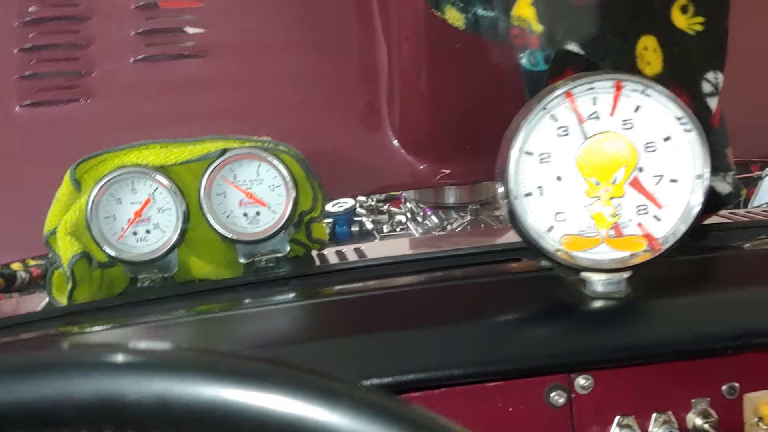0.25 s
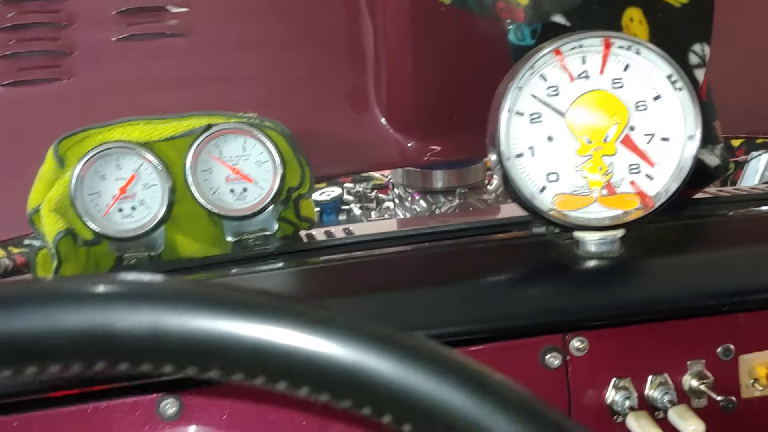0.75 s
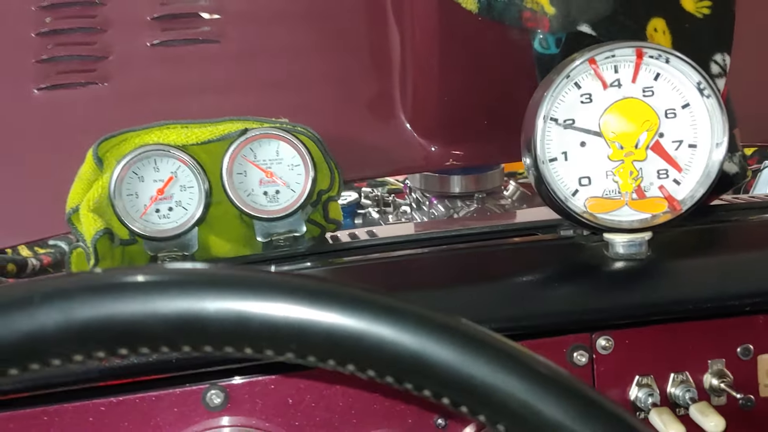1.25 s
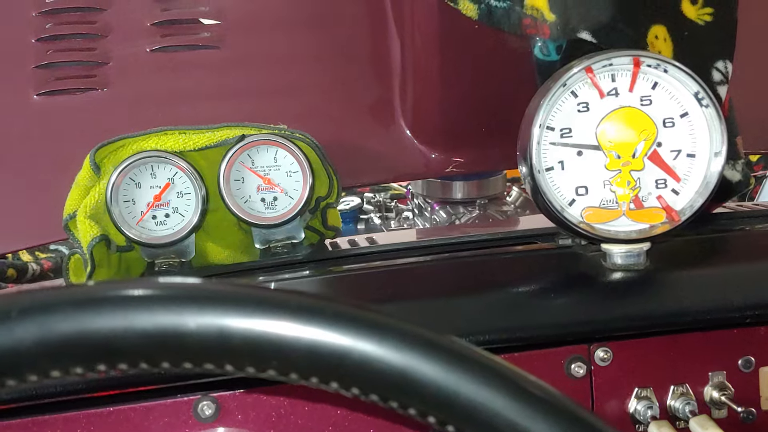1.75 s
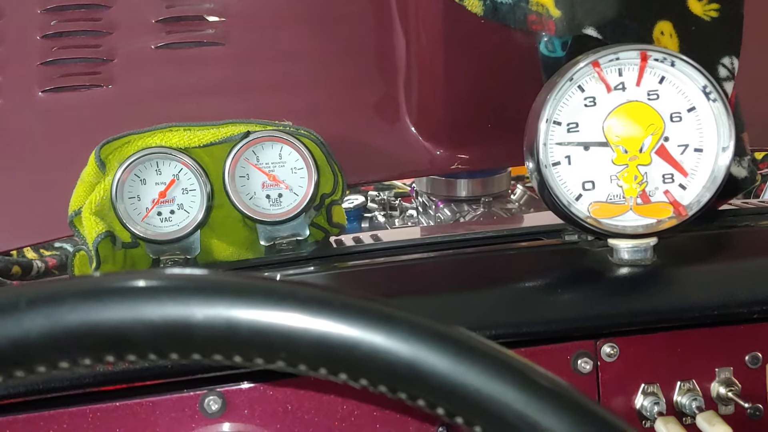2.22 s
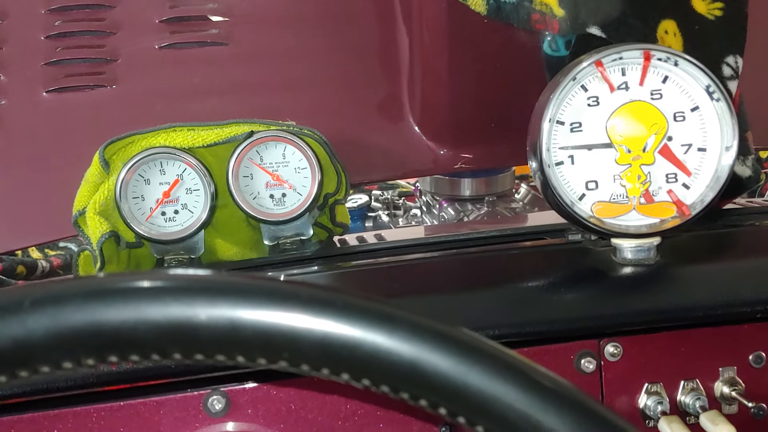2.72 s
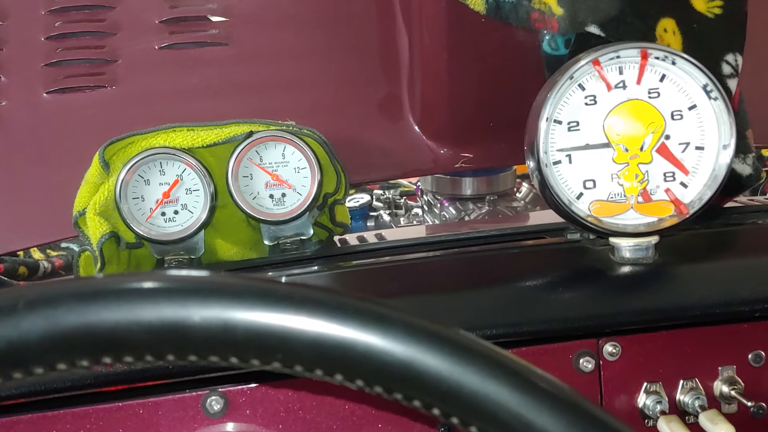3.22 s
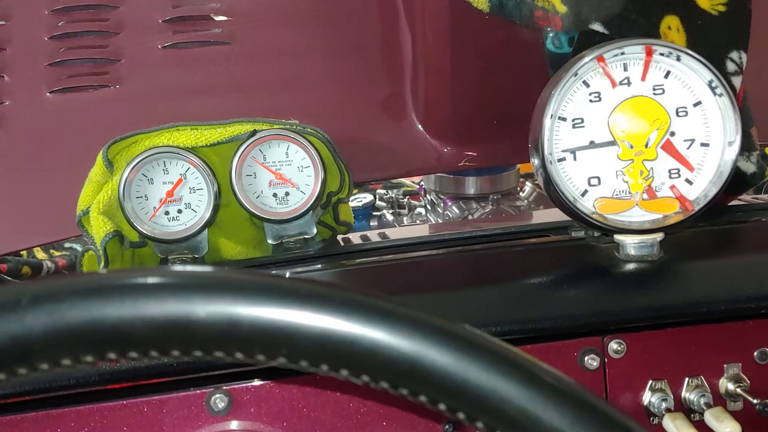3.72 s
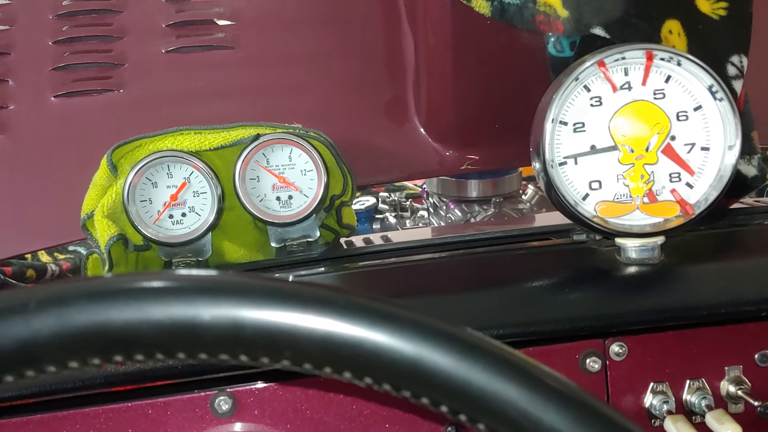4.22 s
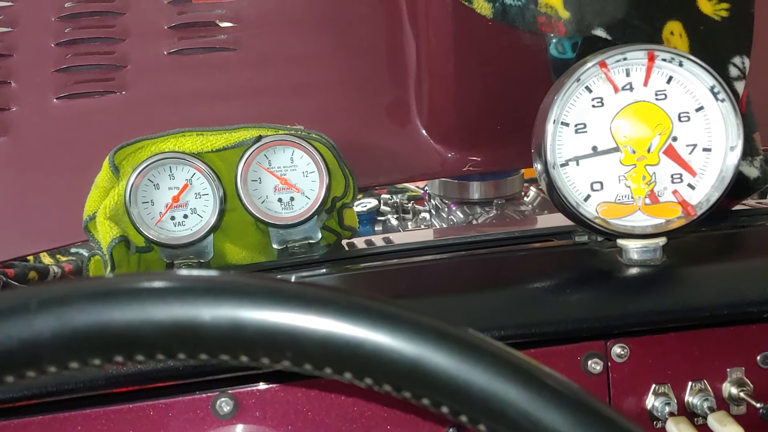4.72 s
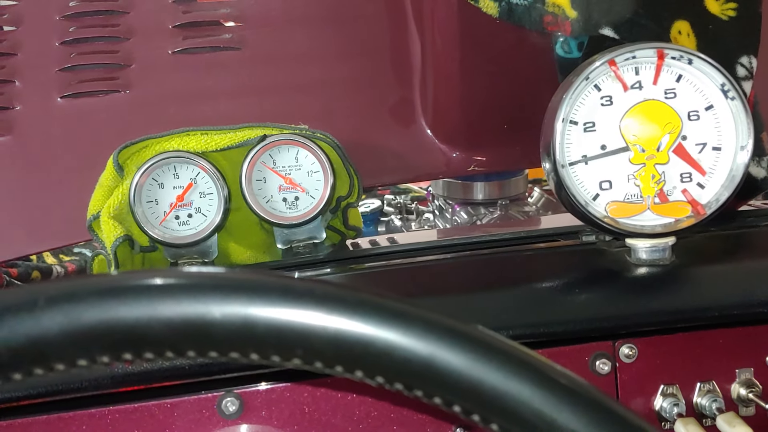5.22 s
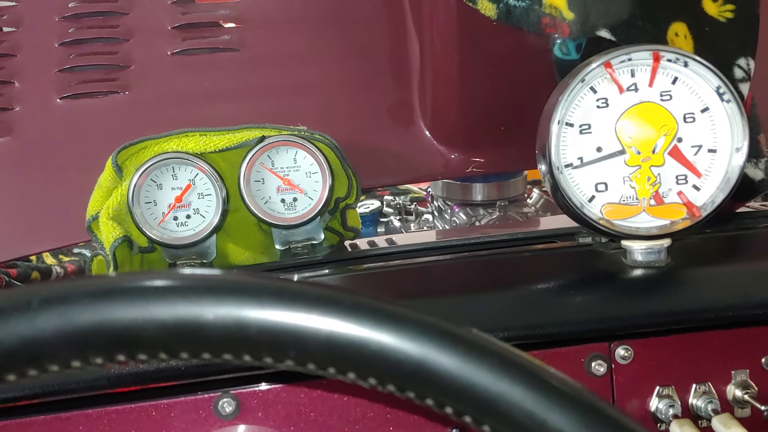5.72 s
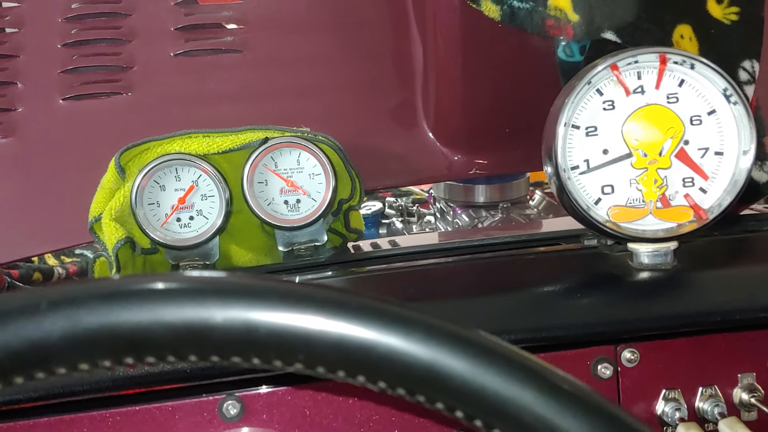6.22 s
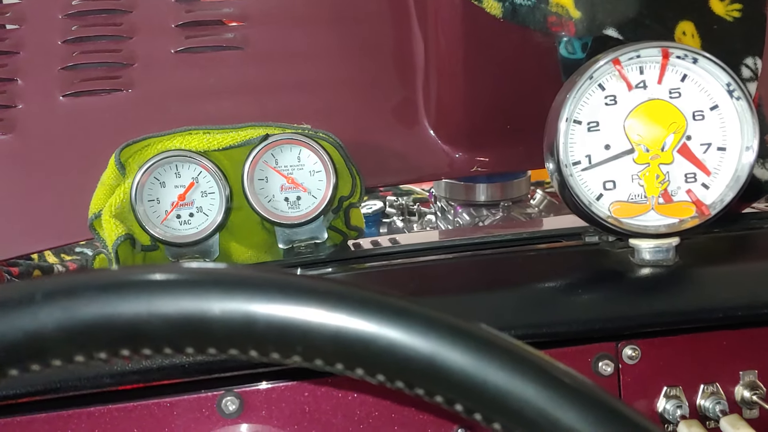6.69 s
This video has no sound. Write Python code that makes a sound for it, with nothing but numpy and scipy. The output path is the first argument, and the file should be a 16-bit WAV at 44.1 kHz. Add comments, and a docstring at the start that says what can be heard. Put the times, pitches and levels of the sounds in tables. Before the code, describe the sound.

A big carbureted engine is heard from the driver's seat, starting mid-rev with a raspy intake bark. The throttle shuts within a quarter second and the pitch slides down into a deep, lumpy idle. Irregular hard firings thud, the carburetor spits back softly, and panels rattle. Close stereo microphones, very loud, boomy bass, no voices.

```python
"""Truck cab: an eight-cylinder carbureted engine, a blip of throttle, then the revs sag to a lumpy idle.
Uneven firings (cycle harmonics plus random pulses) boom and growl through pipe and cab responses.
Hard firings thud as decaying sines; valve gear, ticking and intake hiss are bands of throbbing noise.
Spits back through the carburetor are noise bursts; random taps ring the dash panels, a loose part chimes.
Two unlike microphone ports hear it; a limiter holds the peaks just under full scale."""
import sys
import numpy as np
from scipy import signal
from scipy.fft import rfft, irfft
from scipy.io import wavfile
from scipy.ndimage import uniform_filter1d, minimum_filter1d

SR = 44100
rng = np.random.default_rng(int(sys.argv[2]) if len(sys.argv) > 2 else 0)


def dump_mix(stems):
    """Bounce the given channels to the path in sys.argv[1] as a 16-bit WAV at rate SR."""
    frames = np.atleast_2d(stems).T  # one column per channel
    limited = np.clip(frames, -1, 1)  # hard clip at full scale
    pcm = np.round(limited * 32767).astype(np.int16)
    wavfile.write(sys.argv[1], SR, pcm)


def amplitude_ratio(level_db):
    """Convert a level in decibels to the matching linear amplitude (field) ratio."""
    exponent = np.asarray(level_db, float) / 20
    return 10 ** exponent


N = 306495
TIME = np.arange(N) / SR
HZ = np.fft.rfftfreq(N, 1 / SR) + 1e-3  # offset keeps the log finite

# crank speed: t/s, firing rate/Hz, load (0 throttle open, 1 coasting, 2 idle)
CRANK_SPEED = [(0, 190, 0), (.18, 240.8, 0.1), (.25, 237.5, 0.83), (.4, 219.4, 0.84), (.6, 197.8, 0.57),
               (.9, 154.7, 0.87), (1.1, 137.9, 0.78), (1.3, 128, 0.6), (1.6, 115.3, 0.85), (2, 104.9, 1.17),
               (2.5, 96.04, 1.29), (3, 90.43, 1.66), (4, 79.88, 1.94), (4.8, 73.86, 1.8),
               (5.2, 70.53, 2.09), (6, 58.8, 1.86), (6.5, 54.43, 1.5), (6.95, 52.86, 1.4)]
# weak firing, then a hard one: t/s of the hard one, dip before it/dB, relative level/dB, ring f/Hz
HARD_FIRINGS = [(0.64, -15, -12, 79.5), (0.69, 0, -1, 83), (0.845, -12, -4, 69), (0.973, -5, -1, 71.6),
                (1.185, -9, -9, 76.9), (1.39, -8, 0.5, 86), (1.461, -13, 2.5, 79.6), (1.607, -7, -7, 81),
                (1.725, -12, -9, 75), (1.862, -18, 1, 78.1), (1.95, -10, -9.5, 77.6),
                (2.195, -11, 7.5, 76.4), (2.436, -16, 5.5, 83.4), (2.58, -4, -4, 91), (2.64, -5, -5, 91),
                (2.844, -7, 2, 97.4), (3.018, -11, -11, 98), (3.12, -7, -7, 86), (4.991, -9.5, 1.5, 69.7),
                (5.456, -9, 4, 65), (5.595, -6.5, -1, 67), (5.685, -5.5, -5, 72), (5.77, -11, -2.5, 79),
                (5.854, -9, -11, 64), (5.958, -9, -8, 61.6), (6.137, -2.5, 4, 68.7), (6.242, -7.5, 0.5, 73),
                (6.303, -13, -6, 61), (6.411, -7, -1, 57.34), (6.516, -6, 3, 51.3), (6.61, -7, 2.5, 59.8),
                (6.685, -4, -1, 73.34), (6.84, -15, -7, 70.6)]
# spits back through the carburetor: t/s, relative level/dB, relative treble level/dB
CARB_SPITS = [(0.3084, -15.5, -40), (0.371, -29, -36), (0.4424, -29, -35), (0.6593, -16, -40),
              (0.9403, -22, -45), (1.6242, -16, -40), (1.8858, -28, -49), (1.9662, -22, -50),
              (2.129, -25, -37), (2.3882, -19.5, -51), (2.5965, -18.5, -49), (2.6959, -29, -43),
              (2.864, -22, -42), (2.915, -34, -37), (3.1266, -27, -37), (3.3877, -25, -37),
              (3.5783, -20.5, -53), (3.7738, -24.5, -37), (3.9699, -25, -36.5), (4.3635, -33, -38),
              (4.72, -34, -38), (4.9105, -23, -38), (5.1506, -22.5, -40), (5.238, -26, -39.5),
              (5.3782, -26, -39.5), (5.463, -22.5, -40), (5.597, -34.5, -42), (5.7994, -30, -40),
              (5.8711, -26, -36.5), (5.886, -17, -36.5), (5.9794, -18.5, -37), (6.142, -14, -35),
              (6.3096, -27, -38), (6.4108, -18, -34), (6.4394, -18.5, -37.5), (6.5176, -21, -37),
              (6.6092, -13.5, -35.5), (6.6394, -16.5, -35), (6.6977, -30, -49), (6.7251, -20.5, -41),
              (6.8503, -25, -42), (6.9017, -17.5, -41)]


def unit(x):
    """Scale to rms 1."""
    return x / np.sqrt(np.mean(x ** 2))


def curves(table):
    """Columns of a time table, one value a sample."""
    s, *columns = np.transpose(table)
    return [np.interp(TIME, s, c) for c in columns]


def shape(hz, values):
    """A spectrum interpolated on a log-frequency axis, one value a bin."""
    return np.interp(np.log(HZ), np.log(hz), values)


def filt(x, response):
    """Apply a frequency response."""
    return irfft(rfft(x) * response, N)


def steep(edge_hz, order):
    """Power-complementary low and high halves around an edge."""
    low_power = 1 / (1 + (HZ / edge_hz) ** order)
    return np.sqrt(low_power), np.sqrt(1 - low_power)


def even(x, window_s, share):
    """Iron out a share of the slow swell of x."""
    size = int(window_s * SR)
    power = uniform_filter1d(uniform_filter1d(x ** 2, size), size)
    return unit(x / (power + 1e-9) ** (share / 2))


def walk(rate_hz):
    """Random levels held 1 / rate_hz and slewed twice."""
    hold = int(SR / rate_hz)
    steps = np.repeat(rng.standard_normal(N // hold + 1), hold)
    return 0.85 * uniform_filter1d(uniform_filter1d(steps, hold), hold)[:N]


def burst(start_s, rise_s, fall_s):
    """Rise-and-decay envelope with peak 1."""
    t = np.maximum(TIME - start_s, 0)
    env = (1 - np.exp(-t / rise_s)) * np.exp(-t / fall_s)
    return env / env.max()


def dip(at_s, depth_db, half_s):
    """A Gaussian notch in a level, in dB; half_s is its 1/e half-width."""
    return depth_db * np.exp(-((TIME - at_s) / half_s) ** 2)


def pair(response):
    """Noise for both ports, alike in the bass and nearly unrelated in the treble."""
    # likeness of the ports: f/Hz, correlation (0-1)
    likeness = [(60, 0.44), (130, 0.65), (280, 0.74), (600, 0.58), (1290, 0.21), (2770, 0.06), (12000, 0.1)]
    alike = shape(*np.transpose(likeness))
    mid, side = rfft(rng.standard_normal((2, N)))
    both = np.sqrt(1 + alike) * mid + np.sqrt(1 - alike) * side * np.array([[1], [-1]])
    return irfft(both * response, N)


def cab():
    """Broad response of pipe and cab air, plus narrow cab resonances."""
    # broad response: f/Hz, level/dB
    broad = [(20, -93), (32, -14.5), (55, -1.5), (66, -0.5), (78, 5.5), (92, -2), (104, -29.5),
             (125, -17.5), (160, -13), (190, -19), (215, -22), (300, -27.5), (420, -38), (800, -74)]
    # resonances relative to it: f/Hz, full width/Hz, level/dB
    modes = [(125, 10.4, -3), (190, 8.4, 6.5), (304.8, 19, 2.5)]
    peaks = sum(amplitude_ratio(db) / (1 + 2j * (HZ - f) / width_hz) for f, width_hz, db in modes)
    return amplitude_ratio(shape(*np.transpose(broad))) * (1 + peaks)


def chime():
    """A small loose part rings as a decaying sine."""
    # t/s, peak level/dB, t60/s
    strokes = [(4.915, -52, .2), (5.14, -47, .35), (5.37, -49.5, .7)]
    env = sum(amplitude_ratio(db) * burst(s, .004, t60_s / np.log(1000)) for s, db, t60_s in strokes)
    return env * np.sin(2 * np.pi * 3600 * TIME)


def rattle(shake_db, kick_power, per_s=250, spread_db=3.0, knock_db=11):
    """Loose taps of uneven size ring the dash panels; each port hears its own mix of them."""
    # panel resonances: f/Hz, half-width/Hz, left relative level/dB, right relative level/dB
    panels = [(345.6, 17, -10, -6.5), (463, 46, -10, -10.5), (710, 14.7, 0.5, 2), (915, 26.4, -3, -1.5),
              (969.6, 13.44, -0.5, -3.5), (1747, 57, -10, -1), (2053, 35, -6, 4.5), (2333, 35, -16, -4),
              (2800, 23, -15, -22), (3050, 18, -16.5, -17), (3496, 16, -13.5, -13.5), (4070, 20, -25, -27)]
    hits = rng.random((2, N)) < per_s / SR
    size_db = spread_db * np.minimum(rng.exponential(size=(2, N)), 2)
    taps = hits * amplitude_ratio(size_db) * rng.standard_normal((2, N))
    shake = np.sqrt(amplitude_ratio(shake_db) ** 2 + kick_power)
    taps = (taps[0] + 0.76 * taps[1] * np.array([[1], [-1]])) * shake / np.std(taps)
    # each spit also lands as one clean knock
    for s, db, _ in CARB_SPITS:
        taps[:, int(s * SR)] += amplitude_ratio(db + knock_db)
    rings = sum(amplitude_ratio([[left_db], [right_db]]) / (1 + 1j * (HZ - f) / width_hz) ** 2
                for f, width_hz, left_db, right_db in panels)
    return amplitude_ratio(22) * filt(taps, rings)


def spit_powers():
    """Power envelopes of the spits, body and treble."""
    body, treble = 0, 0
    for s, db, treble_db in CARB_SPITS:
        env = burst(s - .005, 0.0033, 0.026)
        body = body + (amplitude_ratio(db - 14) * env) ** 2
        treble = treble + (amplitude_ratio(treble_db - 3) * env) ** 2
    return body, treble


def upper(phase, clatter_db, tick_db, hiss_db, shake_db, gate_db=0.4, flicker_db=1.5):
    """Clatter, ticking and hiss throb with the firings and jump at each spit, which also jolts the panels."""
    # noise colour at each port: f/Hz, left relative level/dB, right relative level/dB
    ports = [(255, -43.5, -46), (526, -51.5, -52.5), (830, -52.5, -50), (1294, -50.5, -52),
             (1466, -82, -54), (1923, -55, -44), (3200, -59.5, -61), (5930, -72.5, -69.5),
             (7014, -71, -52.5), (8250, -96, -68.5), (8620, -81, -77), (11780, -60, -73.5),
             (12500, -87, -72), (13600, -96, -77), (15700, -100, -84.5)]
    hz, left_db, right_db = np.transpose(ports)
    colour = amplitude_ratio([shape(hz, left_db), shape(hz, right_db)])
    noise = pair(colour * steep(200, order=4)[1])
    (low, above_low), (below_high, high) = steep(1460, order=8), steep(5250, order=8)
    clatter, tick, hiss = (unit(filt(noise, band)) for band in (low, above_low * below_high, high))
    throb = amplitude_ratio(gate_db * np.cos(2 * np.pi * phase) + flicker_db * walk(9) + 0.7 * walk(60))
    spit, spit_treble = spit_powers()
    # powers add: a spit is more of the same coloured noise
    layers = ((clatter, clatter_db, amplitude_ratio(-2) * spit),
              (tick, tick_db, amplitude_ratio(-5.5) * spit),
              (hiss, hiss_db, spit_treble))
    mix = sum(np.sqrt((amplitude_ratio(db) * throb) ** 2 + jump) * x for x, db, jump in layers)
    return mix + rattle(shake_db, amplitude_ratio(-6.5) * spit) + chime()


def bark(phase, gate_db=5):
    """The open throttle lets each intake stroke rasp through the air horn; it shuts as load rises from 0."""
    # air horn resonances: f/Hz, half-width/Hz, rms level before gating/dB
    horn_modes = [(440, 88, -30), (900, 210, -26), (2400, 340, -30.5)]
    load = curves(CRANK_SPEED)[1]
    opening = np.clip(1 - load / 0.55, 0, 1)
    horn = sum(amplitude_ratio(db) * unit(pair(1 / (1 + 1j * (HZ - f) / width_hz) ** 2)) for f, width_hz, db in horn_modes)
    return opening * amplitude_ratio(gate_db * np.cos(2 * np.pi * phase)) * horn


def thuds(rise_s=0.015, fall_s=0.023, trim_db=-6):
    """A hard firing kicks the cab air, which rings a few cycles."""
    return sum(amplitude_ratio(db + trim_db) * burst(s, rise_s, fall_s) * np.sin(2 * np.pi * hz * (TIME - s))
               for s, _, db, hz in HARD_FIRINGS)


def stumbles():
    """How far weak and missed firings pull the boom down, in dB."""
    # further weak or missed firings, each a short sag in the boom: t/s, dip/dB, half-width/s
    sags = [(0.493, -4, 0.026), (.79, -8, .04), (1.56, -6, .025), (2.12, -8, 0.042), (2.38, -5, 0.038),
            (2.52, -7, 0.026), (2.73, -5.5, .02), (2.79, -7, 0.0299), (3.295, -3, 0.062),
            (4.101, -6.5, 0.042), (4.84, -7, 0.027), (5.045, -12, 0.011), (5.12, -4.5, 0.024),
            (5.36, -4.5, .07), (5.495, -6, .015), (6.018, -3.5, 0.014), (6.458, -9.5, .025),
            (6.777, -6.5, .03)]
    lead_s, half_s = 0.017, 0.021
    weak = sum(dip(s - lead_s, db, half_s) for s, db, *_ in HARD_FIRINGS)
    return weak + sum(dip(*row) for row in sags)


def exhaust(jitter_periods=.1, waver_db=3.5, rough_db=5):
    """Cycle harmonics make the repeating part of the firings; random pulses, one a firing, fill in between."""
    # two banks firing unevenly favour 3, 5, 11 and 13 beside the firing rate at 8
    # multiple of the cycle rate, level/dB throttle open, level/dB coasting, level/dB idle
    orders = [(3, -20.5, -5.5, -22.5), (5, 5, -11.5, -16.5), (6, -17.5, -2, -14.5), (7, -22, -14.5, -16),
              (8, -3.5, -2, 1.5), (9, 0, -14.5, -12.5), (10, -11, -9.5, -11.5), (11, 0, -4.5, -10.5),
              (12, -15.5, -10.5, -14.5), (13, 0.5, -1.5, -11), (15, -9, -7, -13), (16, 0.5, -1, -12.5),
              (20, 2, -1, -16.5)]
    cylinders = 8
    hz, load = curves(CRANK_SPEED)
    phase = np.cumsum(hz) / SR  # in firings
    steady = 0
    for start, (k, *db) in zip(rng.random(len(orders)), orders):
        roughness_db = rough_db * max(k / cylinders - 1, 0) * walk(25)
        level_db = np.interp(load, np.arange(3), db) + waver_db * walk(6) + roughness_db
        steady = steady + amplitude_ratio(level_db) * np.sin(2 * np.pi * (k * phase / cylinders + start))
    # the higher lines smear out on their way through the muffler
    steady = filt(steady, steep(290, order=4)[0])

    count = np.arange(1, int(phase[-1]))
    jitter, size = rng.standard_normal((2, len(count)))
    at_s = np.interp(count + jitter_periods * jitter, phase, TIME)
    pulses = np.zeros(N)
    np.add.at(pulses, np.minimum((at_s * SR).astype(int), N - 1), size)
    # chance is least where the engine runs evenly
    chance_db = -4 + dip(3.87, -8.5, 0.99)
    # a pulse of size 1 at every firing makes a line of amplitude 2 hz / SR
    chance = amplitude_ratio(chance_db) * pulses * SR / (2 * hz)
    return filt(steady + chance, cab()), phase


def scene():
    """Boom and growl share the firings; the cab adds a little rumble that differs between the ports."""
    # relative levels: t/s, cab boom/dB, exhaust growl/dB, block clatter/dB, valve ticking/dB,
    # intake hiss/dB, dash rattle/dB
    layer_levels = [(0, -14, -6.5, -22, -22.5, -24, -34), (.14, -18, -6, -23.5, -26.5, -24.5, -36),
                    (.2, -6, -16, -26, -30.5, -34, -37), (.24, -24, -17, -26, -30.5, -36, -36),
                    (.42, -8, -14, -25.5, -28.5, -37.5, -35), (.7, -7, -15, -30, -30, -42, -37),
                    (1.3, -9, -17.5, -33, -32, -44, -36), (1.7, -4, -17.5, -36, -34, -44, -39),
                    (2.2, -7, -19.5, -36, -35.5, -44.5, -39), (2.65, -6, -17, -36, -35, -44, -37),
                    (3.3, -7, -20, -41, -41.5, -45.5, -44), (3.6, -5, -22.5, -40.5, -42.5, -46, -45),
                    (4.3, -5.5, -27.5, -42, -44.5, -45, -45), (4.85, -6, -27, -41.5, -45, -46.5, -45),
                    (5.4, -8, -24.5, -39, -39, -46, -43), (6.1, -8, -25, -39.5, -38.5, -49, -42),
                    (6.8, -11, -29, -41, -38, -48, -39), (6.9, -5, -27, -40, -37.5, -48, -40)]
    pipe, phase = exhaust()
    boom_db, growl_db, *upper_db = curves(layer_levels)
    low, high = steep(110.5, order=16)
    boom = amplitude_ratio(boom_db + stumbles()) * even(filt(pipe, low), 0.042, 0.67) + thuds()
    rumble = unit(pair(cab() * high))
    growl = amplitude_ratio(growl_db) * (amplitude_ratio(-1.5) * even(filt(pipe, high), .15, .9) + amplitude_ratio(-8) * rumble)
    # the boom is slightly louder on the right
    return boom * amplitude_ratio([[-.7], [.7]]) + growl + upper(phase, *upper_db) + bark(phase)


def roll_off(x):
    """The treble ends steeply here."""
    return signal.sosfilt(signal.butter(12, 15800, fs=SR, output="sos"), x)


def record(dry):
    """A look-ahead limiter with a 10 ms window holds the peaks near full scale."""
    peak = np.abs(dry).max(axis=0) + 1e-9
    gain = minimum_filter1d(np.minimum(1, .98 / peak), size=441)
    mix = dry * uniform_filter1d(gain, size=441)
    return roll_off(mix)


dry = scene()
out = record(dry)
dump_mix(out)
```